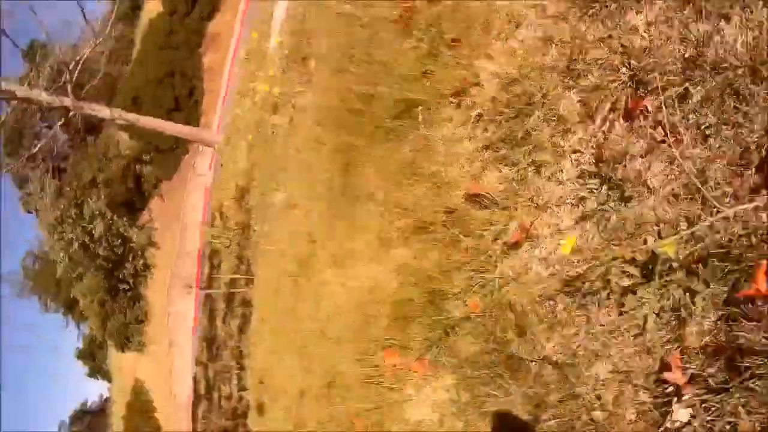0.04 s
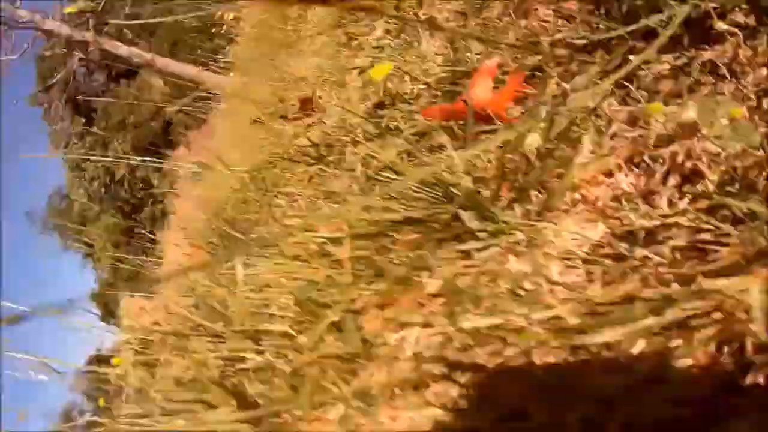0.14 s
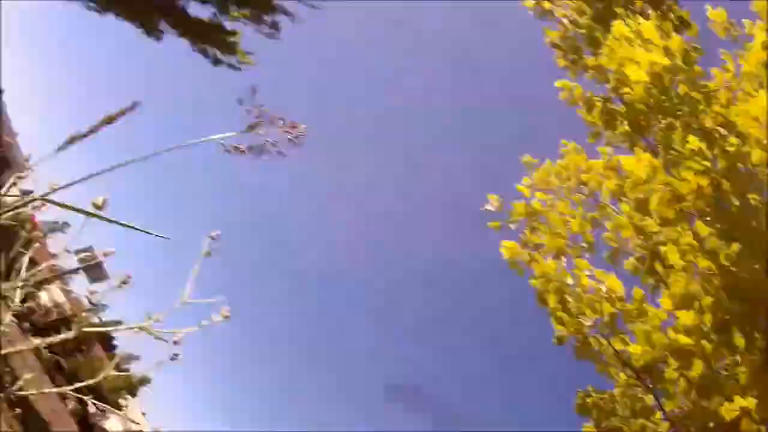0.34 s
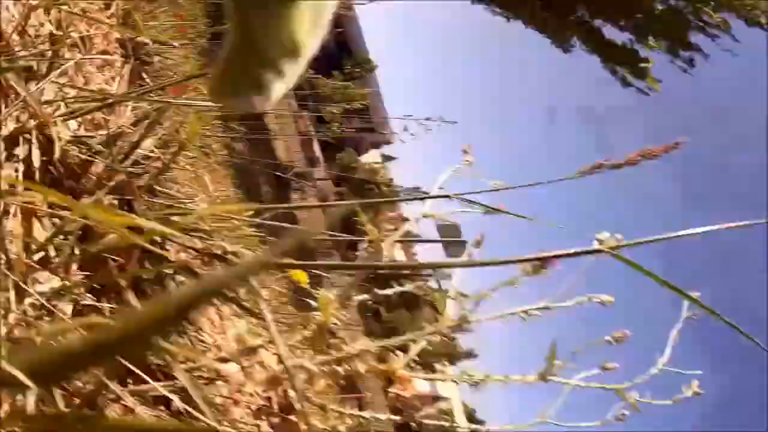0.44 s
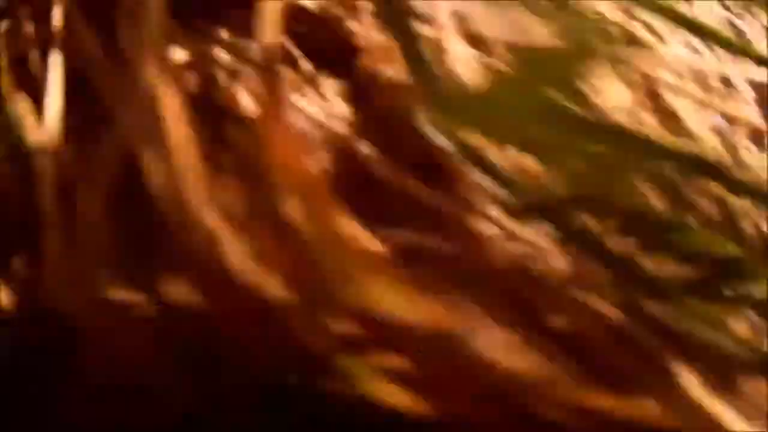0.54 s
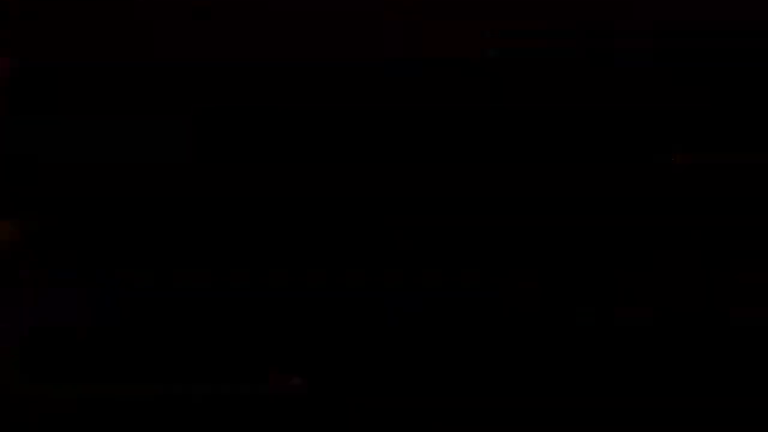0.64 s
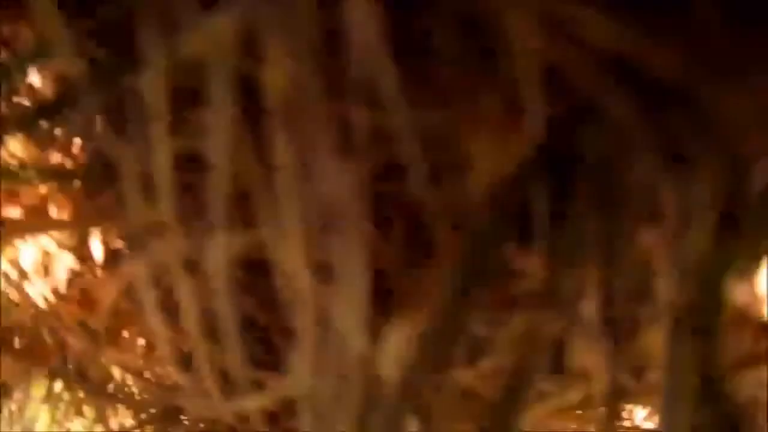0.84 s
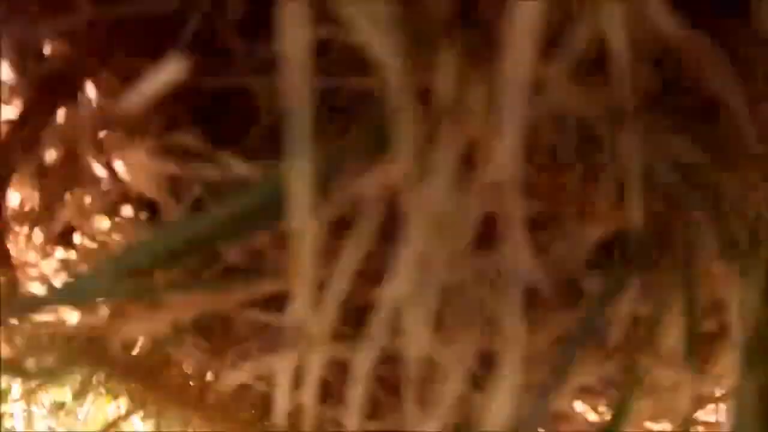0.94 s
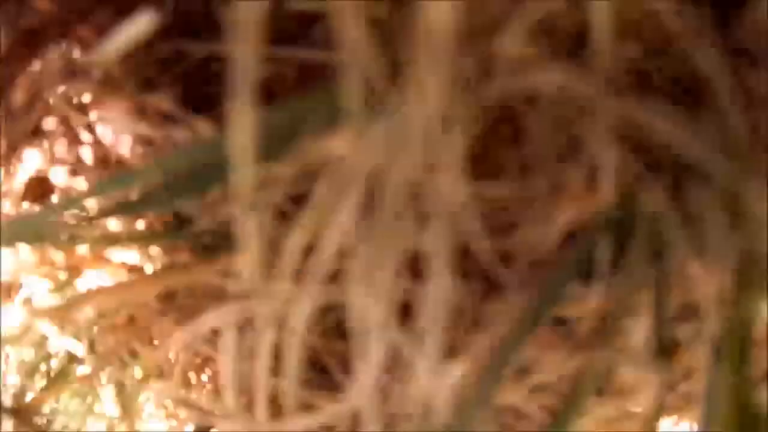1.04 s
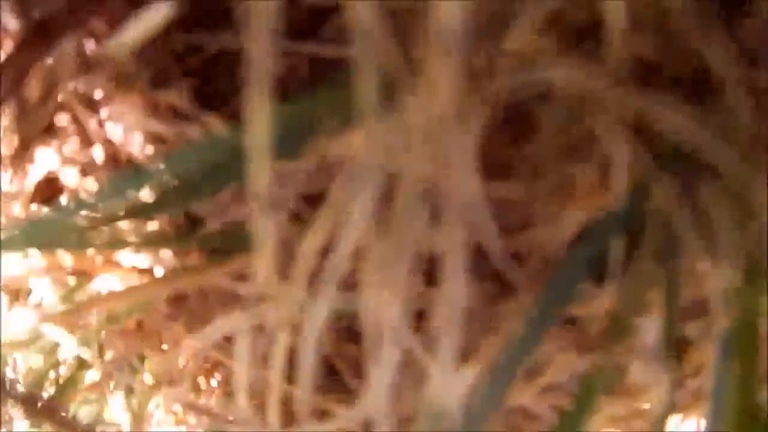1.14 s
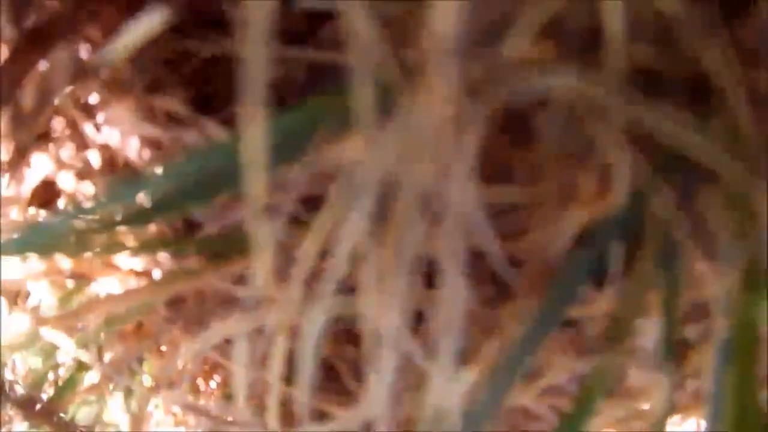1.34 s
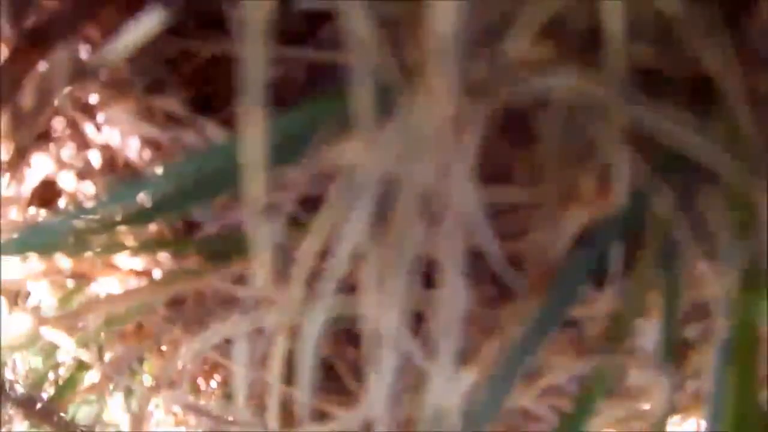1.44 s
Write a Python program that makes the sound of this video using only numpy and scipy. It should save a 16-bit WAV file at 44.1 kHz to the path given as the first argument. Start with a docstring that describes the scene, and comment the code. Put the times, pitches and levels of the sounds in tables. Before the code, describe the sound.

A small drone crashes and tumbles through dry grass with crunching plastic knocks.

```python
"""A low, wavering rotor hum over a field, heard from a small drone's own microphone as it comes down.
The drone hits the ground and tumbles through dry grass. Each contact knocks and crunches the plastic
shell, and the big blows thump the microphone into overload. Stalks scrape and snap right along the
body until it comes to rest in quiet outdoor air."""
import sys
import numpy as np
from scipy import signal
from scipy.fft import rfft, irfft
from scipy.io import wavfile

SR = 44100
rng = np.random.default_rng(int(sys.argv[2]) if len(sys.argv) > 2 else 0)


def persist_wave(psi):
    """Save psi, clipped to +-1, as 16-bit WAV."""
    counts = np.round(np.clip(psi, -1, 1) * 32767).astype(np.int16)
    wavfile.write(sys.argv[1], SR, np.atleast_2d(counts).T)


N = 66150
TIME = np.arange(N) / SR


def undb(db):
    """Decibels to gain."""
    return 10 ** (np.asarray(db) / 20)


def unit(x):
    """Scale to rms 1."""
    return x / np.sqrt(np.mean(x ** 2) + 1e-18)


def curve(rows, column=1):
    """One column of a table, joined by straight lines in time."""
    rows = np.array(rows)
    return np.interp(TIME, rows[:, 0], rows[:, column])


def colour(x, spectrum):
    """Shape a sound by (Hz, dB) points, at rms 1."""
    hz, db = np.array(spectrum).T
    bins_hz = np.maximum(np.fft.rfftfreq(N, 1 / SR), 1)
    gain = undb(np.interp(np.log(bins_hz), np.log(hz), db))
    return unit(irfft(rfft(x) * gain, N))


def noise(spectrum):
    """Coloured noise at rms 1."""
    return colour(rng.standard_normal(N), spectrum)


def filtered(x, kind, hz, order=2):
    """A gentle low-pass or high-pass."""
    return signal.sosfilt(signal.butter(order, hz, kind, fs=SR, output="sos"), x)


# The last moment aloft, heard on board. Each row: time in seconds, level in dB, hum centre in Hz.
FLIGHT_PATH = [(0, -29, 346.4), (.055, -38.5, 314.3), (.08, -30, 342), (.13, -30.5, 401),
               (.185, -27.5, 481.5), (.235, -22.5, 517)]
# Air rushing over the body. Each row: frequency in Hz, relative level in dB.
RUSH_SPECTRUM = [(25, -9), (200, -0.5), (450, -2), (750, -10), (1200, -16.5), (1700, -21.5), (2700, -42),
                 (4000, -44.5), (6000, -47), (9000, -61), (15000, -68.5)]


def flight(hum_width_hz=130, hum_db=-7.5, rush_db=-1, stall_s=.012):
    """A wavering hum and rushing air grow until the first blow stalls the rotors."""
    waver = filtered(rng.standard_normal(N) + 1j * rng.standard_normal(N), "low", hum_width_hz / 2)
    phase = 2 * np.pi * np.cumsum(curve(FLIGHT_PATH, column=2)) / SR
    hum = unit(np.real(waver * np.exp(1j * phase)))
    first_blow = CONTACTS[0][0]
    stall = np.exp(-np.maximum(TIME - first_blow, 0) / stall_s)
    return undb(curve(FLIGHT_PATH)) * stall * (undb(hum_db) * hum + undb(rush_db) * noise(RUSH_SPECTRUM))


# The open field all around. Each row: frequency in Hz, relative level in dB.
FIELD_SPECTRUM = [(25, 5.5), (80, -1.5), (170, -6), (260, -12.5), (450, -17.5), (2000, -32.5),
                  (15000, -34.5)]


def field_air(level_db=-53):
    """Quiet outdoor air lies steadily under everything."""
    return undb(level_db) * noise(FIELD_SPECTRUM)


# The shell, right at the microphone. Each row: resonance in Hz, width in Hz, gain in dB.
SHELL_MODES = [(611, 45, -5.5), (860, 110, -10), (1800, 330, -7), (4008, 300, -1), (4600, 77, -16)]


def shell(x):
    """The plastic shell adds its short resonances to the sound it carries."""
    return x + sum(undb(db) * signal.lfilter(*signal.iirpeak(hz, hz / width, fs=SR), x)
                   for hz, width, db in SHELL_MODES)


# The body striking stalks and ground, heard on board. Each row: start in seconds, ring pitch in Hz,
# ring level in dB, crunch level in dB, crunch decay in seconds.
CONTACTS = [(.205, 1560, -24, -48, 0.0037), (0.2112, 2070, -27, -42, 0.0039),
            (0.223, 1800, -22.5, -42, 0.0054), (0.2327, 890, -16, -27.5, 0.0092),
            (0.2393, 657, 13.5, 5.5, 0.0022), (0.2512, 1406, 7, 14, 0.0039), (.2562, 1980, -10, -9, 0.0015),
            (0.2459, 1290, -5, -13, 0.0033), (0.2635, 443, -2, -5, 0.006), (.2727, 550, -32, -12.5, 0.005),
            (0.2795, 394, -2.5, -27, 0.0035), (0.2897, 600, 1.5, -5, 0.0016),
            (0.305, 820, -6, -10.5, 0.0027), (0.3166, 500, -30, -16, 0.0027),
            (0.3267, 339, 1.5, -25, 0.005), (0.3307, 1063, -18.5, -31.5, 0.0066),
            (0.3907, 1360, -27, -33, 0.0017), (0.407, 1730, -16, -20, 0.0013),
            (0.418, 472, -13, -17, 0.0047), (0.4227, 894, -10.5, -17.5, 0.0013),
            (0.432, 1240, -15, -37, 0.0016), (.449, 1110, -19.5, -25, 0.0029),
            (.459, 467, -21, -23.5, 0.0068), (.5265, 890, -16, -24, 0.0023),
            (0.5316, 1770, -0.5, -8, 0.0014), (.538, 1010, -12, -16, 0.0068), (.5495, 1944, 2, -4, 0.0011),
            (0.553, 990, -2, -5, 0.0018), (.555, 670, 0, -29, 0.0018), (0.5663, 320, -17, -10, 0.0026),
            (.571, 1930, -4, -13.5, 0.0016), (.619, 600, 3.5, 0, 0.0013), (.623, 314, -4.5, -12, 0.0052),
            (.6355, 380, -16, -24.5, 0.0035), (0.6583, 1600, -12, -25, 0.0018),
            (0.6739, 1040, 9.5, -6.5, 0.0011), (0.74, 1070, -13, -17, 0.0022),
            (0.7558, 1055, -7, -14.5, 0.0032), (0.7594, 870, -6, -9, 0.0018),
            (0.7631, 526, -12.5, -30, 0.003), (0.7697, 1060, -13.5, -23, 0.0034),
            (0.8038, 885, -39, -19.5, 0.0051), (.812, 935, -5, -23.5, 0.0012),
            (0.815, 493, -1, -17.5, 0.0015), (.819, 1527, -6, -5.5, 0.0032),
            (.833, 700, -33, -19.5, 0.0066), (0.863, 294, -14.5, -33.5, 0.006),
            (0.871, 630, -21, -32, 0.0042), (.9225, 650, -23, -31, 0.0061),
            (0.9148, 1390, -15.5, -29, 0.0032), (0.9412, 2140, -12, -17.5, 0.0016),
            (0.9491, 2326, -15.5, -25.5, 0.0037), (0.96, 1230, -16.5, -28.5, 0.0033),
            (0.983, 1530, -15, -18, 0.0013), (1.012, 1380, -17, -17.5, 0.0027),
            (1.0348, 1250, -13, -21, 0.0014), (1.0432, 1680, -3.5, -39, 0.00067),
            (1.0518, 1414, -14.5, -20.5, 0.0033), (1.0896, 2510, -25.5, -23, 0.004)]
# Plastic crunching on dry ground. Each row: frequency in Hz, relative level in dB.
CRUNCH_SPECTRUM = [(100, -2), (400, -3), (1000, 5.5), (2200, -1.5), (3000, -2.5), (4400, -8), (6000, -11),
                   (10000, -18.5), (15000, -30.5)]


def knocks(contact_s=.00023, crunch_attack_s=.0007, ring_decay_ratio=.87):
    """Each contact rings the struck part, clacks the stiff frame and crunches the shell."""
    clack_hz, clack_db, clack_decay_s = 3950, -8, .0017  # level relative to the crunch
    rings, force = np.zeros(N), np.zeros(N)
    for start, hz, ring_db, crunch_db, decay in CONTACTS:
        age = np.maximum(TIME - start, 0)
        onset = 1 - np.exp(-age / contact_s)
        ring = np.exp(-age / (decay * ring_decay_ratio)) * np.sin(2 * np.pi * hz * age)
        clack = np.exp(-age / clack_decay_s) * np.sin(2 * np.pi * clack_hz * age)
        rings += onset * (undb(ring_db) * ring + undb(crunch_db + clack_db) * clack)
        force += undb(crunch_db) * (1 - np.exp(-age / crunch_attack_s)) * np.exp(-age / decay)
    crunch = shell(force * noise(CRUNCH_SPECTRUM))
    return filtered(rings + crunch, "high", hz=131.6)


# Grass dragging along the body, very close. Each row: time in seconds, level in dB.
DRAG_LEVELS = [(.215, -60.5), (.24, -35.5), (.26, -22.5), (.33, -36), (.355, -41), (.39, -45.5),
               (.42, -31.5), (.485, -38), (.52, -30), (.55, -31.5), (.585, -25.5), (.63, -27),
               (.667, -16.5), (.69, -31.5), (.725, -36), (.76, -29.5), (.79, -34.5), (.815, -25.5),
               (.85, -38.5), (.885, -32), (.945, -23), (.99, -33.5), (1.055, -31), (1.11, -36.5),
               (1.165, -40.5), (1.205, -52.5), (1.28, -61), (1.36, -71.5), (1.5, -83)]
# Its dry rustle. Each row: frequency in Hz, relative level in dB.
GRASS_SPECTRUM = [(60, -15.5), (150, -5), (600, -1.5), (1400, 2), (2300, -2.5), (3000, -6), (5000, -9.5),
                  (9000, -14.5), (15000, -28)]


def grass(clicks_per_s=4200, spread_db=3.5, swish_db=-4, flicker_db=2.38, flicker_hz=110):
    """Countless tiny stalk clicks come in uneven clumps over a soft swish, carried by the shell."""
    sizes = undb(spread_db * np.minimum(rng.exponential(size=N), 5)) * rng.choice([-1, 1], N)
    clicks = unit(sizes * (rng.random(N) < clicks_per_s / SR))
    crackle = colour(clicks + undb(swish_db) * rng.standard_normal(N), GRASS_SPECTRUM)
    clumps = unit(filtered(rng.standard_normal(N), "low", flicker_hz))
    dragging = TIME > DRAG_LEVELS[0][0]
    return unit(shell(crackle)) * undb(curve(DRAG_LEVELS) + flicker_db * clumps) * dragging


# The tumbling frame that carries the microphone. Each row: time in seconds, level in dB.
SHUDDER_LEVELS = [(.225, -21.5), (.26, -9.5), (.325, -14.5), (.355, -29), (.39, -37), (.44, -26), (.5, -41),
                  (.56, -26), (.63, -37.5), (.72, -34.5), (.77, -28), (.83, -28), (.93, -35.5),
                  (1.02, -46.5), (1.17, -59), (1.5, -76)]
# Its low rumble. Each row: frequency in Hz, relative level in dB.
SHUDDER_SPECTRUM = [(20, 1), (70, -4.5), (180, -2.5), (330, -2.5), (700, -19.5), (2000, -60.5)]


def shudder():
    """The frame rumbles while it rolls."""
    rolling = TIME > SHUDDER_LEVELS[0][0]
    return noise(SHUDDER_SPECTRUM) * undb(curve(SHUDDER_LEVELS)) * rolling


# Blows and pushes of air straight on the microphone.
# Each row: start in seconds, frequency in Hz, level in dB, length in seconds.
MIC_BLOWS = [(.2485, 106, 1, 0.0077), (0.2556, 55.6, 2.5, 0.023), (0.2739, 168.7, 0, 0.02),
             (.294, 49.7, 0, 0.016), (.3115, 169, -0.5, 0.0149), (0.322, 69, -2.5, 0.018),
             (.35, 110, -24.5, 0.034), (0.413, 55, -17.5, 0.04), (0.427, 170, -14.5, 0.0095),
             (0.439, 68.6, -16, 0.034), (.553, 194, -17.5, 0.024), (0.627, 184, -20, 0.041),
             (0.6658, 32.37, 3.5, 0.031), (.752, 81, -6, 0.012), (.7615, 180, -14.5, 0.019),
             (0.802, 73, -15, 0.016), (0.812, 112, -12, 0.01), (.826, 49.6, -21, 0.022)]


def thumps():
    """Heavy swings of pressure swell and die away at the microphone."""
    pressure = np.zeros(N)
    for start, hz, db, length in MIC_BLOWS:
        age = np.clip(TIME - start, 0, length)
        swell = np.sin(np.pi * age / length)
        pressure += undb(db) * swell * np.sin(2 * np.pi * hz * age)
    return pressure


# Dry stalks breaking against the body, very close. Each row: start in seconds, crack level in dB,
# splinter level in dB relative to the crack, length in seconds.
STALK_BREAKS = [(0.2562, 5.5, -4.5, 0.002), (.291, -6.5, -7, 0.00075), (0.3003, -27.5, 3, 0.0014),
                (0.31, -33, 0, .001), (0.321, -30, 3, 0.00093), (.3215, -32, 1, .001),
                (0.336, -33.5, 0.5, .003), (.3495, -35, 2.5, .002), (0.3736, -31, -5, .001),
                (0.432, -27.5, -8, .001), (0.55, -8, -21, 0.00033), (.567, -21.5, -4, 0.0022),
                (.6195, -13, -16, 0.0013), (0.712, -27, -13, 0.0012), (.7315, -31, -4.5, .003),
                (0.8205, -11.5, 6, 0.0027), (0.9814, -24, -7, .001), (1.066, -24, -6, 0.0012),
                (1.158, -31.5, -7, 0.00094), (1.18, -38.5, -18.5, 0.0011), (1.218, -49.5, -17.5, 0.00089),
                (1.2803, -46.5, -17, 0.0031), (1.303, -50.5, -15, 0.0013), (1.332, -54, -14, .001)]
# The crack and its brighter splintering. Each row: frequency in Hz, relative level in dB.
CRACK_SPECTRUM = [(500, -21), (3000, -15), (4400, 3.5), (6000, -10), (9000, -20), (15000, -30)]
SPLINTER_SPECTRUM = [(3000, -31.5), (6200, -13), (7500, 3), (10000, -2), (13500, 0), (14500, -10.5),
                     (16000, -18.5)]


def snaps():
    """Brittle stalks break in bursts of a few milliseconds at most, some brighter than others."""
    crack, splinter = noise(CRACK_SPECTRUM), noise(SPLINTER_SPECTRUM)
    breaks = np.zeros(N)
    for start, db, splinter_db, length in STALK_BREAKS:
        burst = np.exp(-(2 * (TIME - start) / length - 1) ** 2)
        breaks += undb(db) * burst * (crack + undb(splinter_db) * splinter)
    return breaks


# Grass touching the microphone. Each row: peak time in seconds, level in dB, half length in seconds.
BLADE_PASSES = [(0.366, -38.5, 0.0047), (0.481, -37.5, 0.015), (0.594, -44, .02), (0.643, -20, 0.005),
                (0.667, -20.5, 0.014)]
# Its hiss. Each row: frequency in Hz, relative level in dB.
SCRAPE_SPECTRUM = [(500, 0), (2000, -14), (4200, -7), (7000, -8), (11000, -10), (15500, -22)]


def scrapes():
    """Blades of grass hiss as they slide across the microphone."""
    touch = sum(undb(db) * np.exp(-.5 * ((TIME - peak) / half) ** 2) for peak, db, half in BLADE_PASSES)
    return noise(SCRAPE_SPECTRUM) * touch


def scene():
    """Flight, crash and tumble over the quiet field, in mono."""
    return (flight() + field_air() + knocks() + grass() + shudder() + thumps() + snaps() + scrapes())[None]


def record(dry):
    """The on-board microphone clips hard on the big blows; the very bottom and the top are cut."""
    clip_level, top_hz = .94, 15700
    clipped = np.clip(dry, -clip_level, clip_level)
    top_cut = signal.ellip(8, .2, 70, top_hz, fs=SR, output="sos")
    return signal.sosfilt(top_cut, filtered(clipped, "high", hz=12, order=1))


dry = scene()
out = record(dry)
persist_wave(out)
```